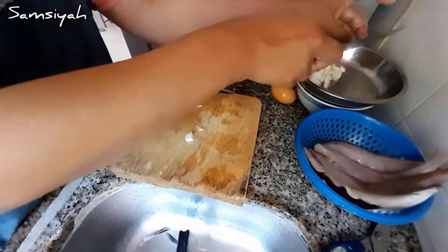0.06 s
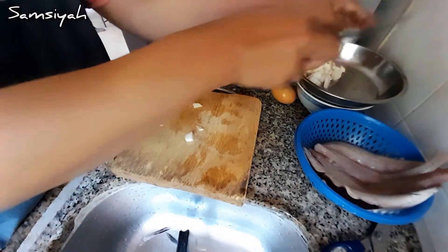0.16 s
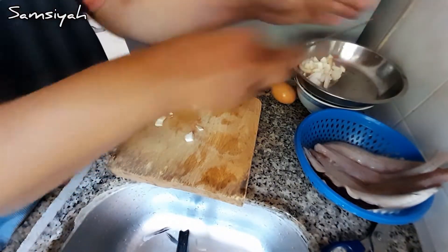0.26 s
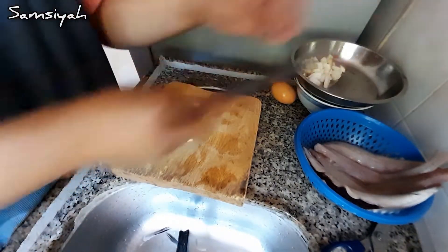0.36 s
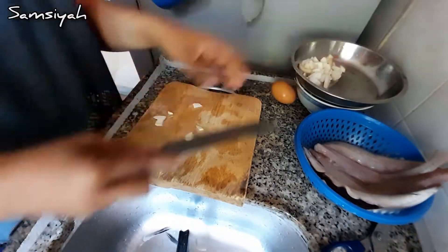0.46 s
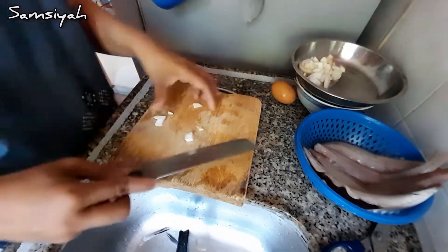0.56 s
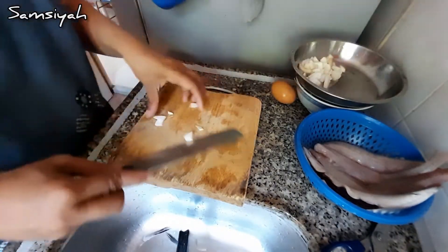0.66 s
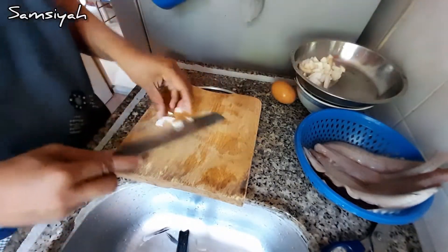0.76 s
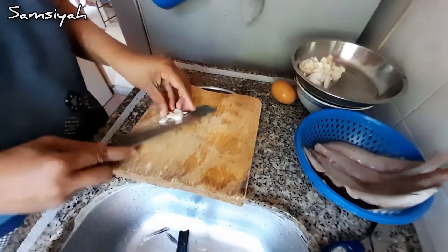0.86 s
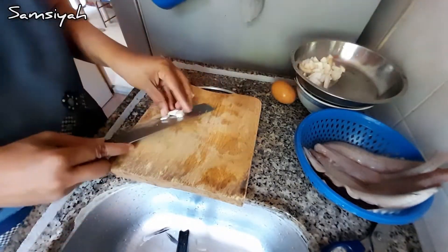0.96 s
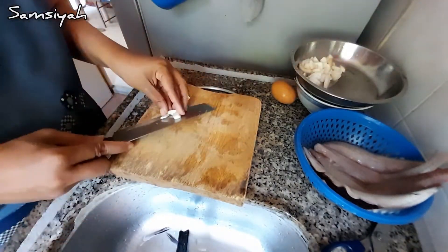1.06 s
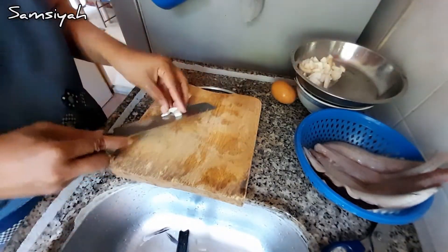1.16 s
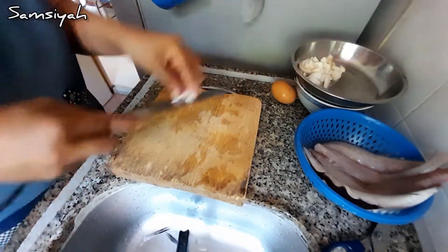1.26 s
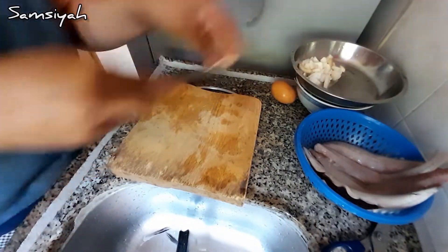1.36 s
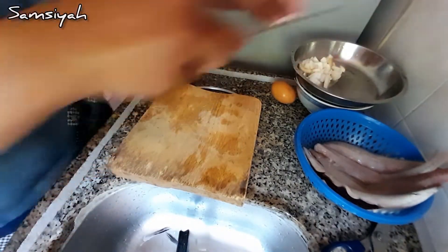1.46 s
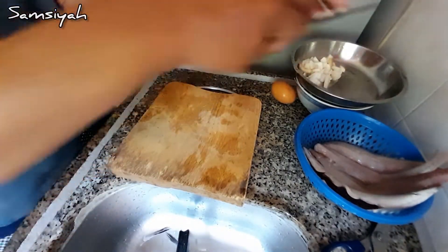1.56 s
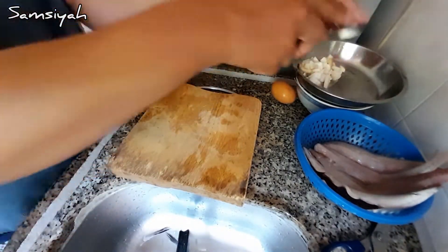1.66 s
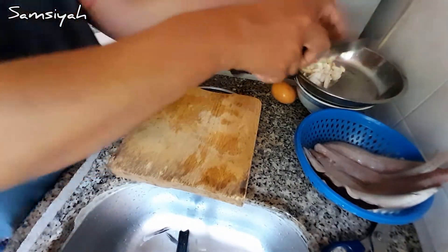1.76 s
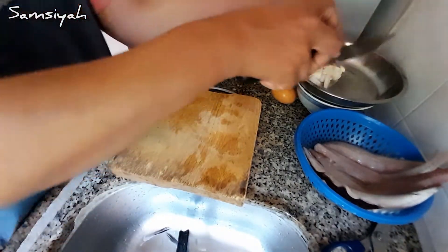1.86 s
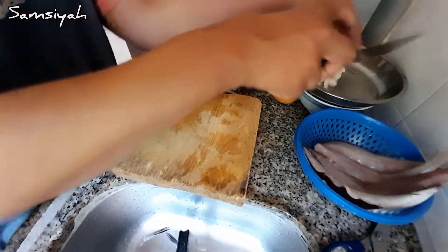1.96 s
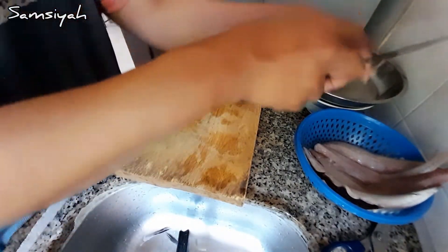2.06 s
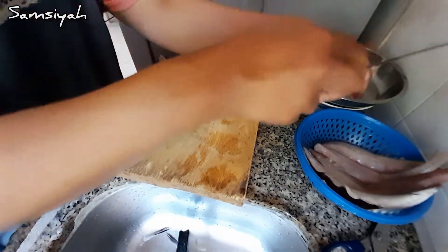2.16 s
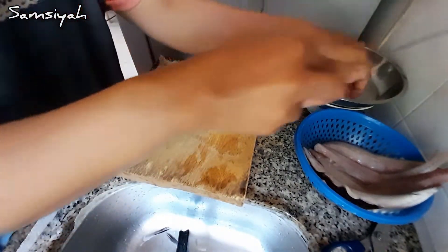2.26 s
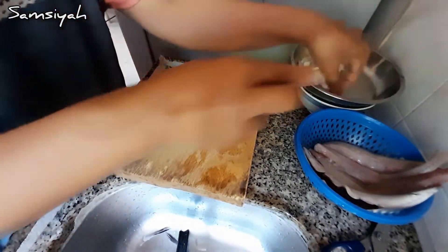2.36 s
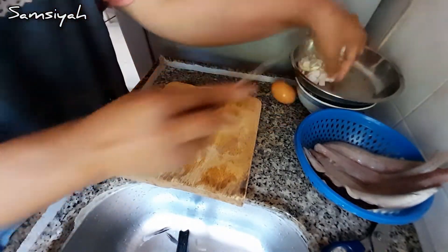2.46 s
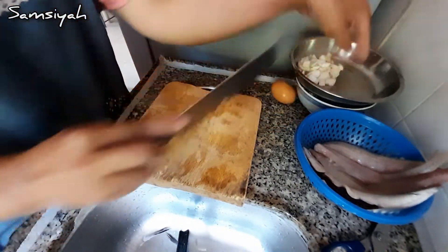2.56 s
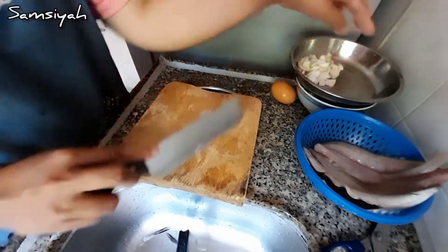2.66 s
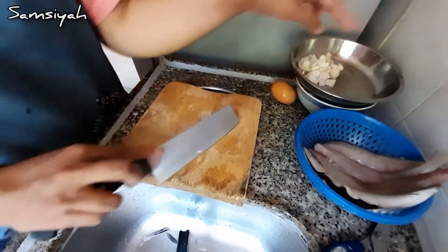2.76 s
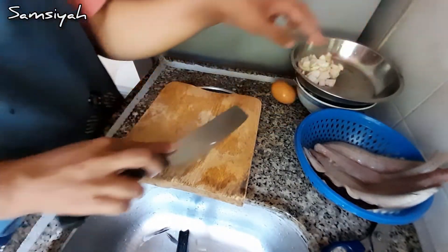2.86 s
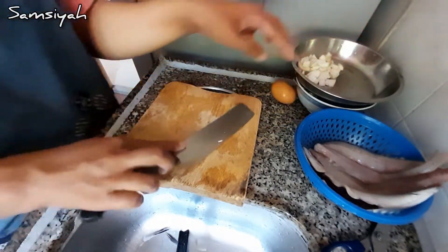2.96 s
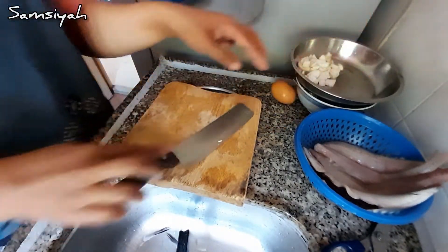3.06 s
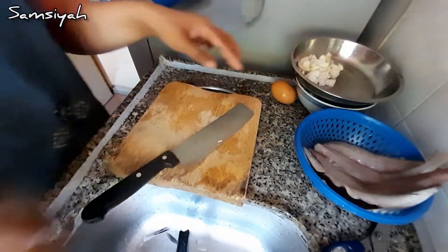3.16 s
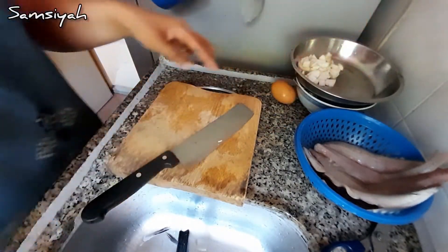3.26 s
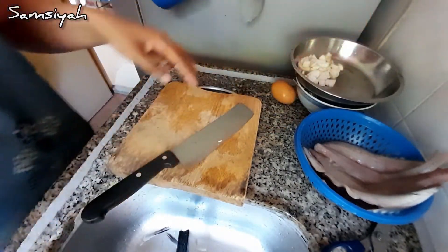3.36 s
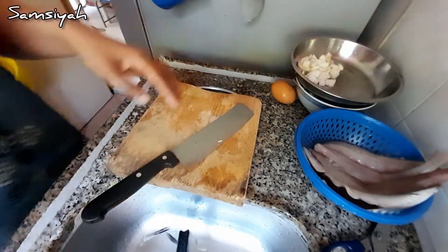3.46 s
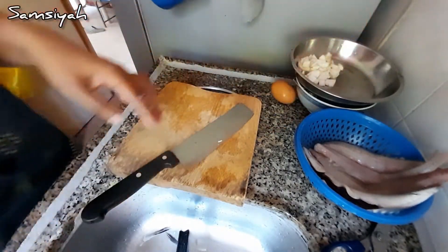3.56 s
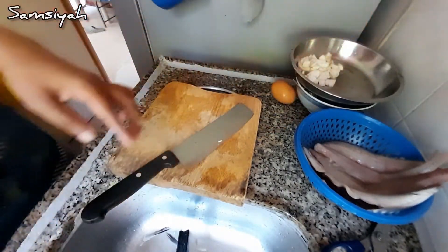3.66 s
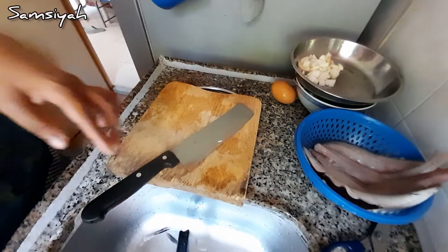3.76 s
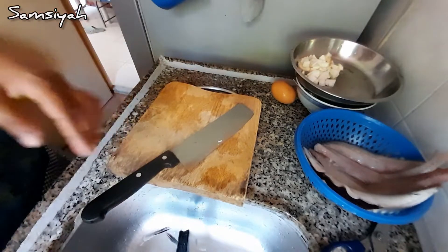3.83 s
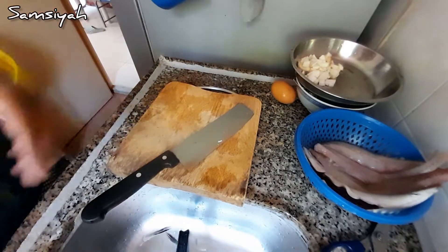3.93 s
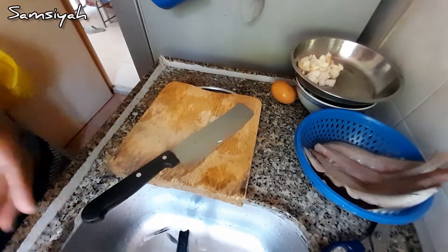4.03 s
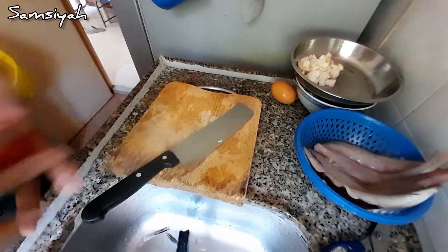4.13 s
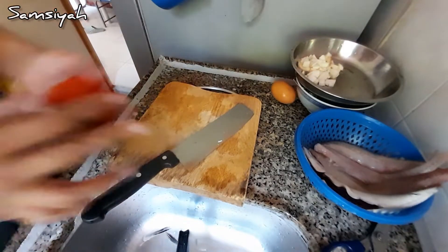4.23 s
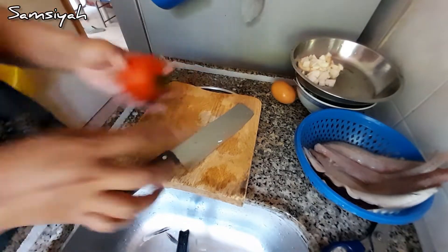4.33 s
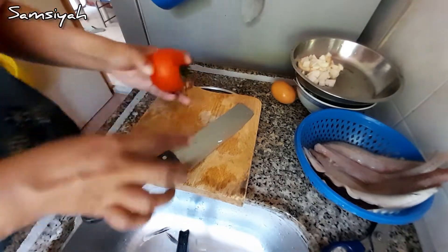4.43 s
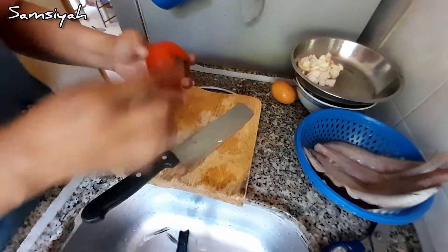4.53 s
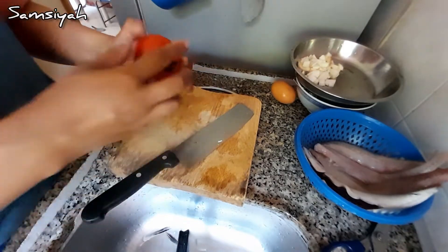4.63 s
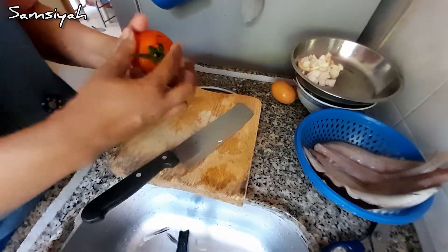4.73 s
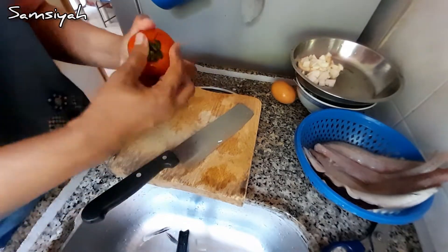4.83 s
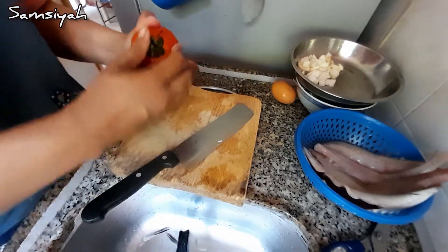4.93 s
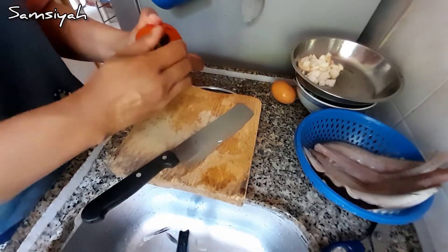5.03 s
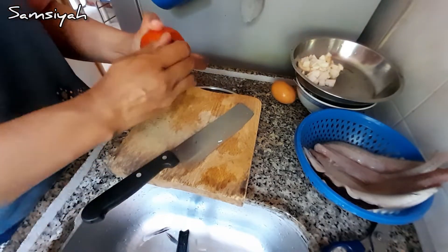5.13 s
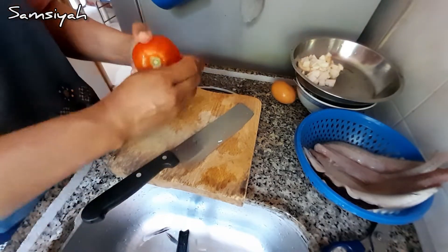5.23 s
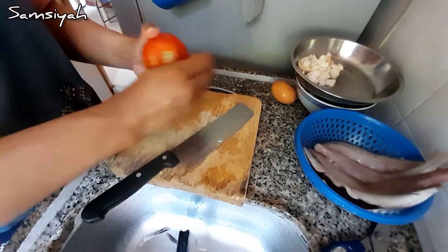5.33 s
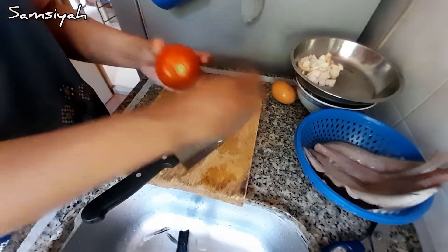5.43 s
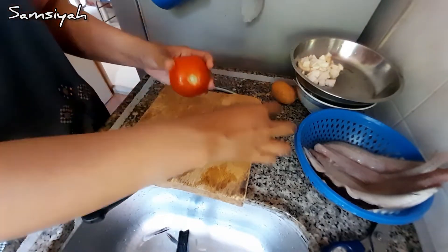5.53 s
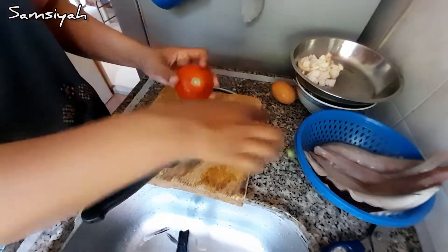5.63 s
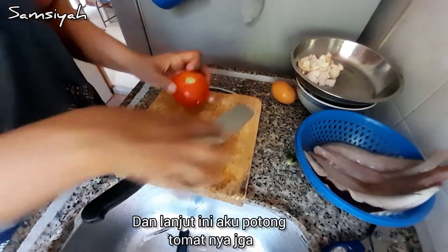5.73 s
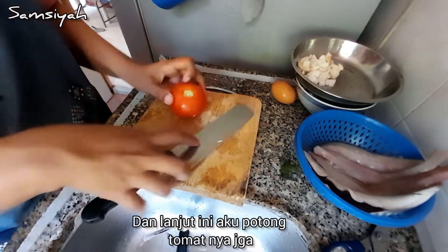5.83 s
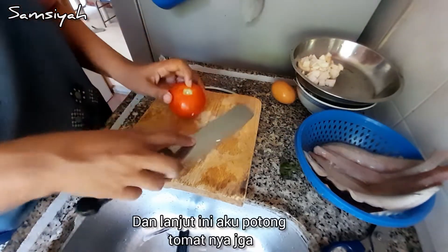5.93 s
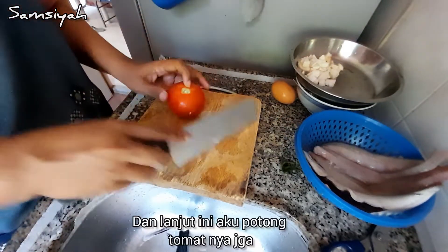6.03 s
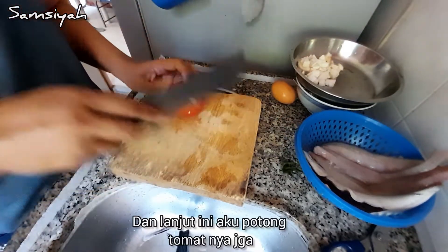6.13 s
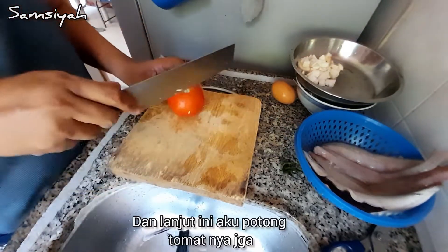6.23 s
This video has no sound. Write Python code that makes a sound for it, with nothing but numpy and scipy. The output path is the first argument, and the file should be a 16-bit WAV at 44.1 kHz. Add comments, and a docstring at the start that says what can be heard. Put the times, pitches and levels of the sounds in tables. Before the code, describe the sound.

In a small tiled kitchen, a knife edge taps a wooden board and scrapes up chopped mushroom with a bright, gritty rasp. Hands and sleeves brush softly and a pan is barely touched. The knife is laid down with a loud woody knock, a short scrape and ringing blade clatter. After a quiet gap a tomato stalk snaps crisply, the tomato thumps faintly, and a low motor hum starts. Close stereo microphones, soft room hiss.

```python
"""A kitchen knife on a wooden board, on the counter of a small kitchen: impacts excite damped modes.
The edge strikes and scrapes up chopped mushroom, by stick-slip; the knife is laid down and its blade clatters.
A tomato's stalk snaps off in noise bursts, the tomato thumps softly, and the knife is picked up again.
A motor starts to hum in sines; hands and clothes brush as filtered grains, tones squeak, a pan is touched.
Filtered noise and a wandering drone make the background; a decaying noise tail makes the echo."""
import sys
import numpy as np
from scipy import signal
from scipy.fft import rfft, irfft, next_fast_len
from scipy.io import wavfile

SR = 44100
rng = np.random.default_rng(int(sys.argv[2]) if len(sys.argv) > 2 else 0)


def master(y):
    """Save y as 16-bit WAV."""
    cut = np.clip(np.atleast_2d(y).T, -1, 1)
    pcm = np.round(cut * 32767)  # scale
    wavfile.write(sys.argv[1], SR, pcm.astype(np.int16))


N = 277389
TIME = np.arange(N) / SR


def from_db(db):
    """Level to amplitude: 20 dB is a factor of ten."""
    return 10 ** (np.asarray(db) / 20)


def rms_one(x):
    """Normalization to unit root-mean-square amplitude."""
    return x / np.sqrt(np.mean(x ** 2) + 1e-20)


def at_hz(points, hz):
    """Interpolation of a table on a logarithmic frequency axis."""
    points = np.array(points)
    return np.interp(np.log(np.maximum(hz, 1)), np.log(points[:, 0]), points[:, 1])


def sides(balance_db):
    """Intensity stereo: left and right gains that differ by the balance."""
    return from_db(np.array([[.5], [-.5]]) * balance_db)


def add(out, s, sound):
    """Superposition: mix a sound in at a time in seconds."""
    at = round(s * SR)
    out[..., at:at + sound.shape[-1]] += sound[..., :N - at]


def colour(pair, spectrum, likeness, tilt_db=0):
    """Minimum-phase filtering at unit power gain, with left-right correlation set by mid-side mixing."""
    length = pair.shape[-1]
    size = next_fast_len(length + 4096) * 2
    hz = np.fft.rfftfreq(size, 1 / SR)
    tilt = tilt_db * np.log2(np.maximum(hz, 1000))  # dB per octave, above 1 kHz
    gain = rms_one(from_db(at_hz(spectrum, hz) + tilt))
    # folding the cepstrum onto positive times makes the filter causal
    cepstrum = irfft(np.log(gain + 1e-9))
    cepstrum[1:size // 2] *= 2
    cepstrum[size // 2 + 1:] = 0
    mid, side = rfft(pair, size) * np.exp(rfft(cepstrum))
    alike = np.clip(at_hz(likeness, hz), -1, 1)
    common = np.sqrt((1 + alike) / 2) * mid
    opposed = np.sqrt((1 - alike) / 2) * side * [[1], [-1]]
    return irfft(common + opposed)[:, :length]


def resonate(x, hz, width):
    """Two-pole resonance of a given bandwidth in Hz, with about unit gain at its peak."""
    r = np.exp(-np.pi * width / SR)
    zeros = np.array([1, 0, -1]) * (1 - r * r) / 2
    poles = [1, -2 * r * np.cos(2 * np.pi * hz / SR), r * r]
    return signal.lfilter(zeros, poles, x)


def waver(width):
    """Narrow-band modulation: a random complex amplitude of rms 1 that wanders within a bandwidth in Hz."""
    hz = np.fft.fftfreq(N // 20, 20 / SR)
    noise = rng.standard_normal(len(hz)) + 1j * rng.standard_normal(len(hz))
    slow = np.fft.ifft(noise / (1 + (hz / width * 1.3) ** 2))
    return np.interp(np.arange(N) / 20, np.arange(len(hz)), slow / np.std(slow))


def grains(per_s, spread_db):
    """Friction as shot noise: two random streams of tiny slips of uneven size."""
    sizes = from_db(spread_db * np.minimum(rng.exponential(1, (2, N)), 4))
    signs = rng.choice([-1, 1], (2, N))
    slipping = rng.random((2, N)) < per_s / SR
    return rms_one(sizes * signs * slipping)


def stroke(peak_s, db, rise_s, fall_s):
    """Friction envelope: it swells and dies away by 20 dB per rise or fall time."""
    away = np.maximum((peak_s - TIME) / rise_s, (TIME - peak_s) / fall_s)
    return from_db(db - 20 * np.minimum(away, 10))


def release(end_s, db_per_s):
    """Exponential decay: the gain holds at 1 until a time and then dies away."""
    return from_db(-db_per_s * np.clip(TIME - end_s, 0, 1))


# spectrum of the air's hiss: (frequency [Hz], relative level [dB])
AIR_SPECTRUM = [(110, -31.5), (190, -9), (260, -22), (344, -11.5), (384, -13), (454, -8), (557, -14),
                (634, -12), (1460, -17.5), (1930, -18), (3500, -24), (5990, -33), (7070, -40.5),
                (9880, -35), (16000, -47)]
# spectrum of the low rumble: (frequency [Hz], relative level [dB])
RUMBLE_SPECTRUM = [(20, -18), (48, 3.5), (78, 4), (105, -2), (180, 4), (260, 4), (500, -29)]
# left-right correlation of diffuse sound: (frequency [Hz], correlation [-1 to 1])
AIR_LIKENESS = [(60, 0.76), (130, 0.88), (290, 0.52), (640, 0.36), (1400, -0.27), (3100, 0.02),
                (15000, -0.041)]
# standing waves of the room: (frequency [Hz], bandwidth [Hz], level before the swell [dB])
STANDING_WAVES = [(62.2, 10, -74), (114, 7.4, -51.5), (152.9, 13.8, -50), (460, 33, -67.5)]
# slow swell of the drone: (time [s], gain [dB])
SWELL = [(0, -2.3), (0.45, 3.5), (1.1, -2.4), (1.8, 1.3), (2.3, 1.1), (3.6, -3.5), (4.2, -0.4), (4.9, 2),
         (5.3, -2.7)]


def room_tone():
    """Broadband noise with modal excitation: soft hiss and rumble, and a drone in the standing waves."""
    hiss = from_db(-54.5) * colour(rng.standard_normal((2, N)), AIR_SPECTRUM, AIR_LIKENESS)
    rumble_shape = RUMBLE_SPECTRUM + [(2000, -74)]
    rumble = from_db(-61) * colour(rng.standard_normal((2, N)), rumble_shape, AIR_LIKENESS)
    drone = 0
    for hz, width, db in STANDING_WAVES:
        wave = np.real(waver(width) * np.exp(2j * np.pi * hz * TIME))
        drone = drone + from_db(db) * np.sqrt(2) * wave
    swell = from_db(np.interp(TIME, *np.transpose(SWELL)))
    return hiss + rumble + drone * swell


# hands and clothes brushing:
# (fastest moment [s], relative level [dB], rise [s], fall [s], treble tilt [dB per octave])
BRUSHES = [(0.27, -62, 0.46, 1, 0), (1.53, -52, 0.13, 0.21, 0.3), (1.84, -56.5, 0.15, 0.21, 0.5),
           (2.37, -53, 0.16, 0.083, 2), (2.65, -53, 0.27, 0.13, 0.75), (3.16, -55.5, 0.12, 0.19, 1.7),
           (3.89, -68.5, 0.067, 0.16, 0), (4.14, -52.5, 0.078, 0.2, 2), (5.05, -61.5, 0.093, 0.12, 5.5),
           (5.5, -63.5, 0.38, 0.4, -1), (5.9, -57, 0.3, 0.46, -3.1), (5.995, -55, 0.055, 0.041, 5)]
# spectrum of rubbing skin and cloth: (frequency [Hz], relative level [dB])
BRUSH_COLOUR = [(710, 8), (1200, 4.5), (1290, -7), (1560, 6), (1700, 4), (4650, 3), (6720, -5), (9930, 2),
                (13600, -2.5), (16000, -14)]


def brush(fibres_per_s, spread_db):
    """Fine-grained friction: skin and cloth rub softly, each stroke with its own brightness."""
    out = np.zeros((2, N))
    fibres = grains(fibres_per_s, spread_db)
    for s, db, rise_s, fall_s, tilt_db in BRUSHES:
        heard = (TIME > s - 2 * rise_s) & (TIME < s + 2 * fall_s)
        rub = colour(fibres[:, heard], BRUSH_COLOUR, AIR_LIKENESS, tilt_db)
        out[:, heard] += stroke(s, db, rise_s, fall_s)[heard] * rub
    return out


# left-right correlation of nearby sources: (frequency [Hz], correlation [-1 to 1])
NEAR_LIKENESS = [(100, 0.98), (400, 0.81), (1000, 0.34), (2500, 0.17), (5000, -0.34), (9000, -0.0092),
                 (15000, -0.0078)]
# modes of the counter: (frequency [Hz], relative level [dB], 60 dB decay time [s])
COUNTER_MODES = [(53, -27, 0.62), (110.6, -4, 0.47), (150.7, 2.5, 0.31), (169.2, -2, 0.52),
                 (229.2, -1.5, 0.26), (260.3, -10.5, 0.27), (333.5, -17, 0.15), (370, -13.5, 0.1),
                 (452.5, -17, 0.26)]


def blows(rows, crack_colour, modes, crack_t60, scatter_db, scatter_t60, spot_db):
    """Impact excitation: a crack, its scatter off nearby things, the object's ring and the counter's thump."""
    out, thumps = np.zeros((2, N)), np.zeros(N)
    t = np.arange(SR * 3 // 4) / SR

    def fade(t60):
        """Exponential damping by 60 dB in t60 seconds."""
        return from_db(-60 * t / t60)

    boom = 0
    for k, (hz, db, t60) in enumerate(COUNTER_MODES):
        boom = boom + (-1) ** k * from_db(db) * fade(t60) * np.sin(2 * np.pi * hz * t)
    for s, crack_db, ring_db, thump_db, soft_hz, tilt_db, spot_hz, pan_db in rows:
        decay = fade(crack_t60) + from_db(scatter_db) * fade(scatter_t60)
        burst = rng.standard_normal((2, len(t))) * decay
        # the stiffness of the touching spot favours one broad band
        burst = burst + from_db(spot_db) * resonate(burst, spot_hz, spot_hz * 0.14)
        sound = from_db(crack_db) * colour(burst, crack_colour, NEAR_LIKENESS, tilt_db)
        for hz, db, t60 in modes:
            # short waves reach the two microphones out of step
            angle = np.arccos(np.clip(at_hz(NEAR_LIKENESS, hz), -1, 1))
            apart = angle * np.array([[.5], [-.5]]) * rng.choice([-1, 1])
            gain = from_db(ring_db + db + rng.normal(0, 1))
            sound += gain * fade(t60) * np.sin(2 * np.pi * (hz * t + rng.random()) + apart)
        add(out, s, sound * sides(pan_db))
        # a soft contact passes less treble into the counter
        softness = signal.butter(1, soft_hz, fs=SR, output="sos")
        add(thumps, s, from_db(thump_db) * signal.sosfilt(softness, boom))
    return out + thumps


# the edge striking the board:
# (time [s], crack [relative dB], ring [relative dB], thump [relative dB], thump softness corner [Hz],
# treble tilt [dB per octave], pitch of the touching spot [Hz], left-right balance [dB])
EDGE_HITS = [(0.5621, -20, -35.5, -31, 400, -3, 2600, -7), (0.5640, -25, -31.5, -47, 400, -0.5, 5060, 3)]
# spectrum of its crack: (frequency [Hz], relative level per Hz [dB])
EDGE_CRACK = [(200, -14), (400, -16), (850, -0.5), (1350, -13.5), (2300, -5.5), (2900, -5.5), (3400, -18),
              (4500, -8), (7200, -14.5), (13500, -21), (16000, -33)]
# modes it rings: (frequency [Hz], relative level [dB], 60 dB decay time [s])
EDGE_MODES = [(830, -10, 0.093), (1618, -6, 0.061), (2120, -14, .08), (2325, 2, 0.071), (2275, -8, 0.068),
              (2720, -11, 0.21), (2860, -3, 0.072), (4330, -9, 0.08)]


def edge_hits():
    """Short impact with modal ringing: the knife's edge strikes the board."""
    return blows(EDGE_HITS, EDGE_CRACK, EDGE_MODES,
                 crack_t60=0.01, scatter_db=-15.5, scatter_t60=0.089, spot_db=-3)


# reverberation time of the room: (frequency [Hz], 60 dB decay time [s])
ROOM_T60 = [(200, 0.41), (1000, 0.24), (4000, 0.22), (14000, 0.21)]


def kitchen(x, wet_db, build_s):
    """Diffuse reverberation: tiled walls return a tail that dies band by band."""
    t = np.arange(SR // 2) / SR
    edges = np.geomspace(300, 18000, 9)  # Hz
    tail = 0
    for low, high in zip(edges, edges[1:]):
        band_filter = signal.butter(2, [low, high], "band", fs=SR, output="sos")
        band = signal.sosfilt(band_filter, rng.standard_normal((2, len(t))))
        tail = tail + band * from_db(-60 * t / at_hz(ROOM_T60, np.sqrt(low * high)))
    build_up = 1 - np.exp(-(t / build_s) ** 2)
    tail = rms_one(tail * build_up) / np.sqrt(len(t))
    return x + from_db(wet_db) * signal.fftconvolve(x, tail, axes=-1)[:, :N]


# steel dragged over wood:
# (fastest moment [s], relative level [dB], rise [s], fall [s], blade lifts off [s])
SCRAPES = [(0.724, -36, 0.14, 0.25, 0.902), (2.83, -48, 0.18, 0.288, 2.95)]
# spectrum of the scrape: (frequency [Hz], relative level [dB])
SCRAPE_COLOUR = [(200, -8), (450, -5), (700, -7.5), (1300, -13.5), (2600, -9), (4700, -10.5), (8000, -16),
                 (10700, -6), (14800, -12.5), (16000, -18)]
# the blade's strong modes: (frequency [Hz], bandwidth [Hz], relative level [dB])
SCRAPE_MODES = [(2830, 79, -7), (4520, 57, 6), (6030, 90, -13), (9400, 88, -7), (10140, 80, -4),
                (10720, 52, -12), (12600, 49, 4), (12930, 300, 9), (14720, 100, 16), (14800, 120, -2)]


def scrape(slips_per_s, spread_db, ring_db, judder_db, steel_t60, shift_hz):
    """Stick-slip: the edge catches on the grain and rings many close blade modes and a few strong ones."""
    judder = from_db(judder_db * np.real(waver(45)))
    slips = grains(slips_per_s, spread_db) * judder
    # decaying noise stands for the many close modes
    t = np.arange(SR // 10) / SR
    steel = rng.standard_normal((2, len(t))) * from_db(-60 * t / steel_t60)
    steel = rms_one(steel) / np.sqrt(len(t))
    slips = 1.2 * slips + signal.fftconvolve(slips, steel, axes=-1)[:, :N]
    # as the touching point travels along the edge, the strong modes come and go
    sung = 0
    for hz, width, db in SCRAPE_MODES:
        sung = sung + from_db(db) * resonate(slips, hz, width) * np.real(waver(shift_hz))
    pressure = 0
    for s, db, rise_s, fall_s, lift_s in SCRAPES:
        lift_off = release(lift_s, db_per_s=297)
        pressure = pressure + stroke(s, db, rise_s, fall_s) * lift_off
    rubbing = slips + from_db(ring_db) * sung
    return pressure * rms_one(colour(rubbing, SCRAPE_COLOUR, NEAR_LIKENESS))


# faint squeaks and hoots:
# (time [s], length [s], start pitch [Hz], end pitch [Hz], bandwidth [Hz], relative level [dB])
SQUEAKS = [(1.837, 0.048, 808, 814, 160, -50.5), (2.338, 0.076, 1116, 1112, 37, -53),
           (3.979, 0.21, 463.6, 462, 5, -52.5), (4.87, 0.07, 400, 350, 60, -53.5),
           (4.903, 0.019, 1093, 1030, 12, -44.5), (5.746, 0.089, 2970, 2540, 160, -56.5),
           (5.865, 0.078, 2286, 2150, 780, -54.5), (6.215, 0.056, 2450, 2690, 210, -50.5),
           (6.26, 0.051, 3030, 2590, 120, -48)]


def squeaks():
    """Frequency glide with random modulation: short unsteady tones swell, glide and fade."""
    out = np.zeros((2, N))
    for s, length, start_hz, end_hz, width, db in SQUEAKS:
        count = int(length * SR)
        phase = 2 * np.pi * np.cumsum(np.linspace(start_hz, end_hz, count)) / SR
        tone = np.exp(1j * phase) * waver(width)[:count]
        pair = np.real(tone * np.exp(1j * np.array([[.5], [-.5]])))  # sides 1 radian apart
        add(out, s, from_db(db) * rms_one(pair) * np.sqrt(np.hanning(count)))
    return out


# light touches of the pan: columns as for the edge hits
# (time [s], crack, ring, thump [relative dB], corner [Hz], tilt [dB per octave], spot [Hz], balance [dB])
PAN_TOUCHES = [(2.1950, -48.5, -47, -51, 400, 0, 760, 0), (2.2120, -48.5, -55, -67, 400, 0.91, 770, 0)]
# spectrum of their crack: (frequency [Hz], relative level per Hz [dB])
PAN_CRACK = [(240, -51), (400, 2.5), (801, -10.5), (1380, -20), (3640, -11.5), (9470, -22.5), (13500, -16),
             (16000, -47)]
# modes of the pan: (frequency [Hz], relative level [dB], 60 dB decay time [s])
PAN_MODES = [(640, -3, 0.17), (815, 4, 0.1), (1150, -5.5, 0.13)]


def pan_touches():
    """Weak impact with modal ringing: the pan is lightly touched."""
    return blows(PAN_TOUCHES, PAN_CRACK, PAN_MODES,
                 crack_t60=0.025, scatter_db=-0.5, scatter_t60=0.21, spot_db=12.5)


# knocks of the knife's handle: columns as for the edge hits
# (time [s], crack, ring, thump [relative dB], corner [Hz], tilt [dB per octave], spot [Hz], balance [dB])
HANDLE_KNOCKS = [(2.6946, -17, -27, -16, 700, -0.52, 1330, -0.72),
                 (2.6975, -16.5, -31, -23, 900, -0.86, 614, -0.22),
                 (2.9828, -26.5, -41, -24, 132, 0.99, 1110, -0.26),
                 (3.0430, -32, -42, -31.5, 300, -0.099, 710, 0), (5.7500, -50, -63, -38, 250, -1, 500, 0),
                 (5.8280, -45.5, -68, -29.5, 81, -0.43, 500, 0)]
# spectrum of their crack: (frequency [Hz], relative level per Hz [dB])
HANDLE_CRACK = [(120, -26), (280, 2.5), (450, -10), (680, -2), (930, -15.5), (1100, -8), (1600, -6.5),
                (2300, -13.5), (4500, -14.5), (7300, -22), (10000, -17), (13000, -18.5), (16000, -38)]
# modes of the wooden board: (frequency [Hz], relative level [dB], 60 dB decay time [s])
BOARD_MODES = [(241, 11.5, 0.074), (303, 3, 0.037), (329, -9.5, 0.43), (374, -18, 0.13), (441, -8.5, 0.22),
               (544, -8, 0.074), (650, -10.5, 0.082), (700, -13, 0.123), (852, -8, 0.066),
               (1044, -9, 0.096), (1114, -3.5, 0.093), (1086, 3, 0.095), (1400, -10, 0.081),
               (1420, -4.5, 0.094), (1600, -8, 0.14), (1680, -3, 0.12), (2060, -19, .1)]


def handle_knocks():
    """Impact on a damped plate: the handle knocks and the wooden board rings briefly."""
    return blows(HANDLE_KNOCKS, HANDLE_CRACK, BOARD_MODES,
                 crack_t60=0.022, scatter_db=-19.0, scatter_t60=0.17, spot_db=-5.0)


# clatter of the blade, and at 5.62 s the soft thump of the tomato: columns as for the edge hits
# (time [s], crack, ring, thump [relative dB], corner [Hz], tilt [dB per octave], spot [Hz], balance [dB])
BLADE_AND_TOMATO_HITS = [(2.9848, -18.5, -27, -23.5, 201, -1, 6000, 0.89),
                         (2.9864, -19.5, -51, -62, 198, 1.5, 5330, 1.6),
                         (3.0331, -23, -38, -56, 202, -2, 4000, 0),
                         (3.0922, -29, -47, -32.5, 304, -2.5, 5370, 2.2),
                         (5.6226, -41.5, -76, -37, 910, -2, 4800, -1.6),
                         (5.7858, -41.5, -58, -43, 400, 2, 5500, -0.17)]
# spectrum of their crack: (frequency [Hz], relative level per Hz [dB])
BLADE_AND_TOMATO_CRACK = [(240, -48.5), (400, -21), (1060, -1.5), (1310, -13), (1490, -9), (2710, -9),
                          (3530, -4.5), (4050, -2.5), (4380, -2), (5350, -3), (8240, -6), (12900, -9),
                          (16000, -16)]
# modes of the steel blade: (frequency [Hz], relative level [dB], 60 dB decay time [s])
BLADE_MODES = [(3042, -21.5, 0.38), (3500, -11, 0.15), (4025, -23, 0.17), (4110, -22, .15),
               (4280, -3, 0.31), (4510, 3, 0.22), (5750, -7, 0.098), (5300, -11.5, 0.23), (5800, -28, 0.32),
               (5976, -12, 0.182), (7070, -15, 0.18), (7700, -27, .2), (10000, -18, 0.22),
               (11400, -13, 0.17), (12800, -2.5, .08), (14650, -21, .15)]


def blade_and_tomato_hits():
    """Impact with modal ringing: the steel blade clatters; the tomato thumps softly, its ring near silent."""
    return blows(BLADE_AND_TOMATO_HITS, BLADE_AND_TOMATO_CRACK, BLADE_MODES,
                 crack_t60=0.013, scatter_db=-12, scatter_t60=0.15, spot_db=4.5)


# snaps of the tomato's stalk: columns as for the edge hits
# (time [s], crack, ring, thump [relative dB], corner [Hz], tilt [dB per octave], spot [Hz], balance [dB])
STALK_SNAPS = [(4.7806, -38.5, -62, -73, 300, -0.69, 5600, 1.6),
               (5.1598, -27, -44, -72, 300, -0.44, 10100, 0.15),
               (5.1625, -25.5, -40, -56, 300, -0.11, 4000, 0.16),
               (5.3374, -54.5, -88, -88, 300, 0, 10000, 0),
               (5.5748, -49.5, -54, -70, 305, -0.18, 10000, 0.12)]
# spectrum of their crack: (frequency [Hz], relative level per Hz [dB])
STALK_CRACK = [(210, -37), (350, -27), (467, -8.5), (1260, -25), (1880, -14.5), (3280, -17), (3980, -5.5),
               (4520, -13.5), (5570, -13), (6850, -23), (10200, -9.5), (16000, -23)]
# modes of the stalk: (frequency [Hz], relative level [dB], 60 dB decay time [s])
STALK_MODES = [(1880, -4.5, 0.069), (3670, -8, 0.022), (8940, -9, .08), (9700, -9, .08)]


def stalk_snaps():
    """Fracture as a noise burst: the stalk snaps and its few modes die quickly."""
    return blows(STALK_SNAPS, STALK_CRACK, STALK_MODES,
                 crack_t60=0.022, scatter_db=-18.5, scatter_t60=0.18, spot_db=-6)


# partials over the motor's hum: (frequency [Hz], level relative to the hum [dB])
MOTOR_OVERTONES = [(232, -30), (467, -25.5), (533, -33)]
# low partials of the starting shudder: (frequency [Hz], relative level [dB])
SHUDDER = [(48, 1.5), (97, -6), (240, 0)]
MOTOR_ON_S = 5.815


def motor(unsteady, shudder_spread):
    """Tonal forcing with a starting transient: a shudder and a surge, then a hum at three times the mains rate."""
    def line(hz, amplitude):
        """Amplitude and phase modulation of one sine."""
        return np.sqrt(2) * np.real(np.exp(2j * np.pi * hz * TIME) * amplitude)

    hum, shudder = 0, 0
    for hz, db in [(150.7, 0)] + MOTOR_OVERTONES:
        hum = hum + from_db(db) * line(hz, 1 + unsteady * waver(31))
    for hz, db in SHUDDER:
        shudder = shudder + from_db(db) * line(hz, 1 + 1.7 * waver(shudder_spread * hz))
    running_s = np.maximum(TIME - MOTOR_ON_S, 0)
    # the surge, 5.5 dB over the steady hum, settles with a 0.1 s time constant
    hum_gain = from_db(-39.5 + 5.5 * np.exp(-running_s / 0.1))
    # the motor shudders until it is up to speed
    shudder_gain = from_db(-51) * release(MOTOR_ON_S + 0.13, db_per_s=450)
    attack = np.minimum(running_s / 0.01, 1)
    return attack * (hum_gain * hum + shudder_gain * shudder)


def scene():
    """Superposition: all the handling sounds in the room, over its background."""
    hits = edge_hits() + pan_touches() + handle_knocks() + blade_and_tomato_hits() + stalk_snaps()
    rubs = from_db(5.5) * brush(fibres_per_s=11000, spread_db=2.5)
    rubs += from_db(4.0) * scrape(slips_per_s=3700, spread_db=2.6, ring_db=-4.0, judder_db=1.0,
                                  steel_t60=0.046, shift_hz=4.4)
    background = room_tone() + kitchen(squeaks(), wet_db=-6.5, build_s=0.028)
    background += motor(unsteady=0.15, shudder_spread=0.36)
    return kitchen(hits, wet_db=-9.0, build_s=0.0041) + rubs + background


# difference in colour between the two microphones: (frequency [Hz], left-right balance [dB])
MIC_BALANCE = [(100, -1.6), (350, 4), (1000, -0.3), (2500, 1.1), (5000, 1.5), (9000, 1.5), (14000, -3.5)]


def record(dry):
    """Band limiting: two microphones of slightly different colour, with the deepest bass and the top cut."""
    size = next_fast_len(N + 4096) * 2
    balance = sides(at_hz(MIC_BALANCE, np.fft.rfftfreq(size, 1 / SR)))
    heard = irfft(rfft(dry, size) * balance)[:, :N]
    bass_cut = signal.butter(2, 24, "high", fs=SR, output="sos")
    top_cut = signal.ellip(10, .2, 80, 15900, fs=SR, output="sos")
    heard = signal.sosfilt(top_cut, signal.sosfilt(bass_cut, heard))
    return np.clip(heard, -1, 1)


dry = scene()
out = record(dry)
master(out)
```